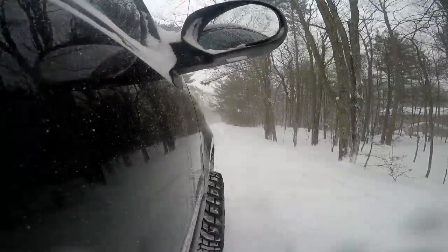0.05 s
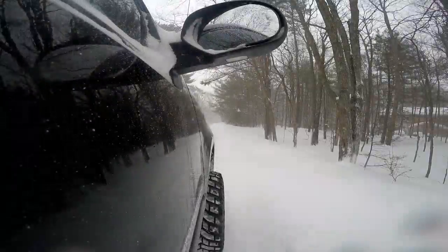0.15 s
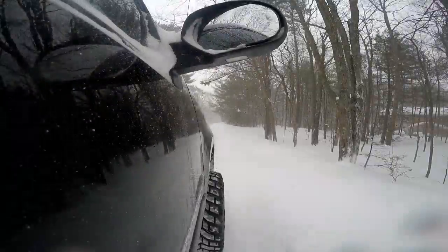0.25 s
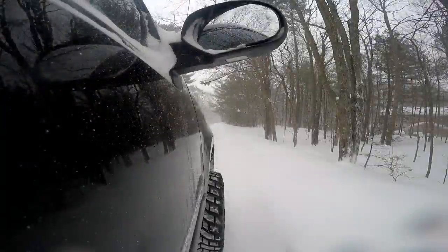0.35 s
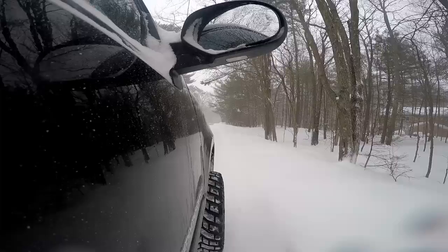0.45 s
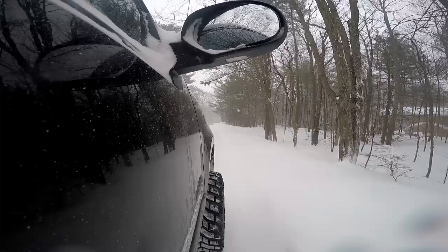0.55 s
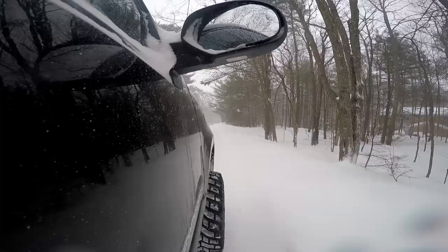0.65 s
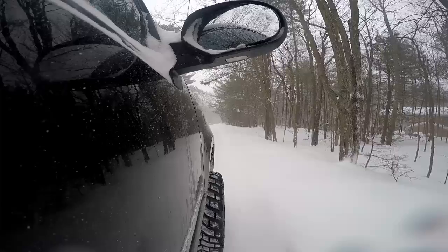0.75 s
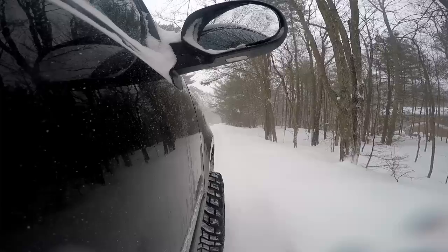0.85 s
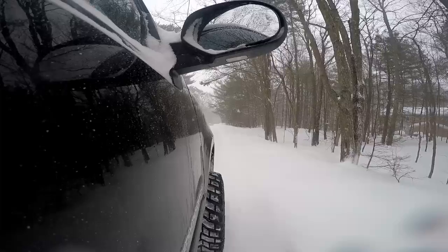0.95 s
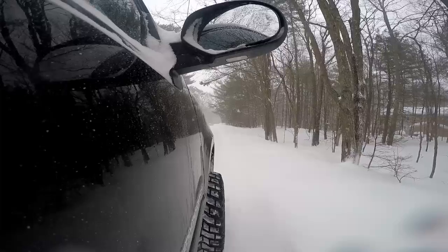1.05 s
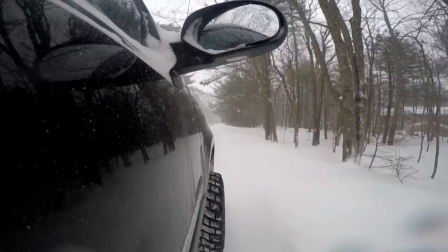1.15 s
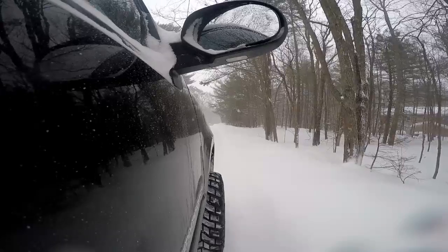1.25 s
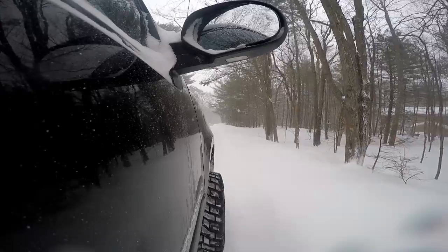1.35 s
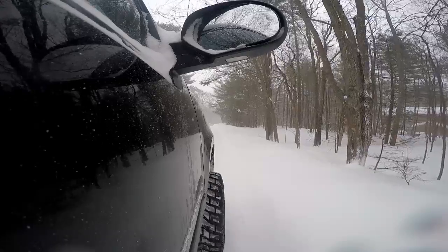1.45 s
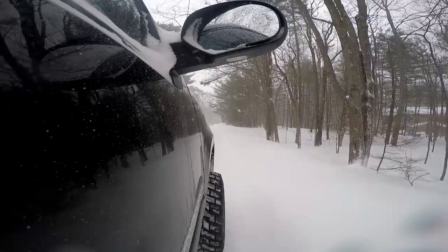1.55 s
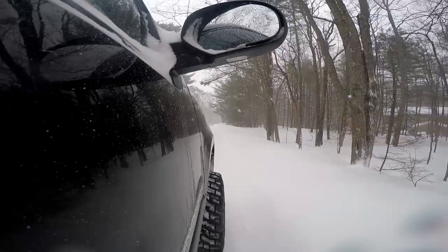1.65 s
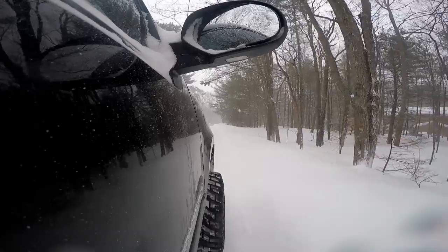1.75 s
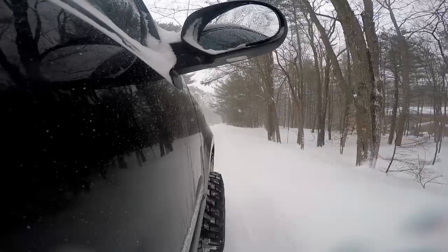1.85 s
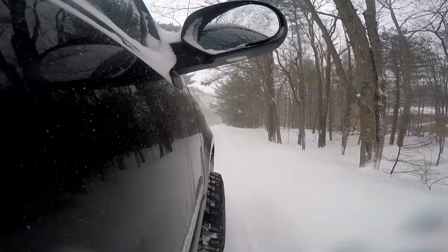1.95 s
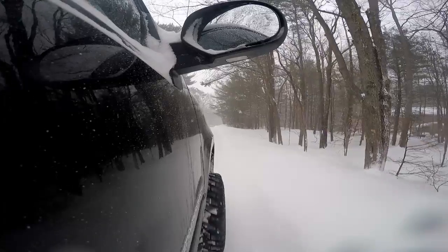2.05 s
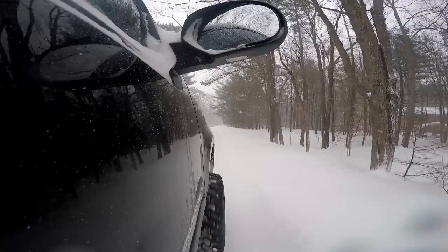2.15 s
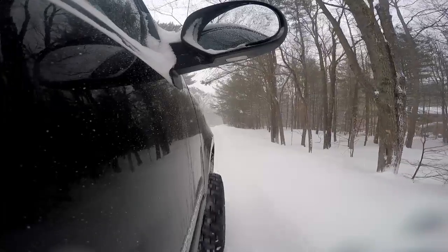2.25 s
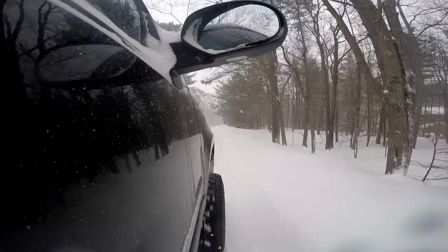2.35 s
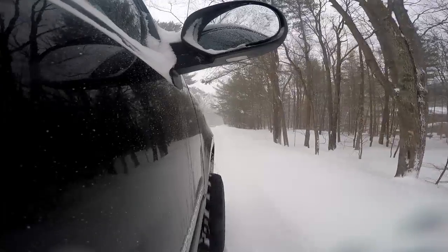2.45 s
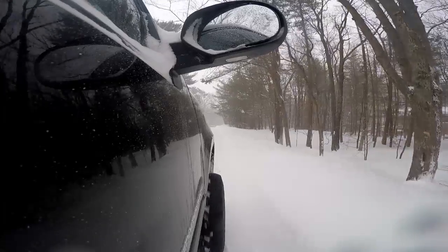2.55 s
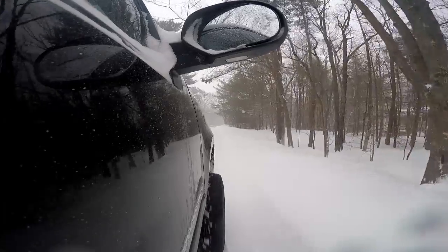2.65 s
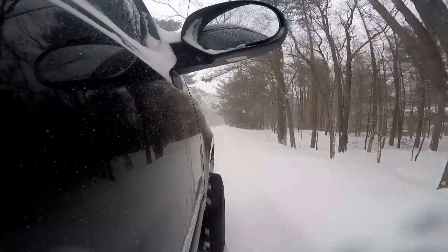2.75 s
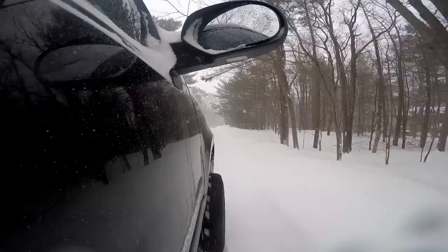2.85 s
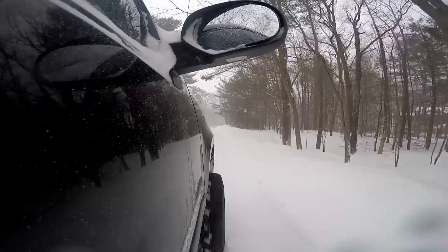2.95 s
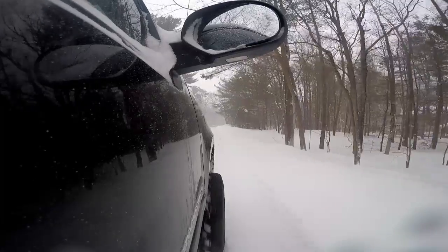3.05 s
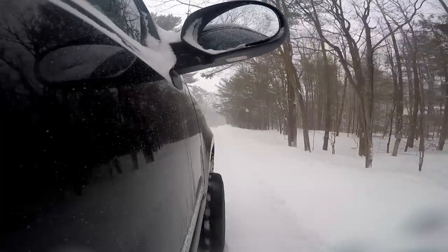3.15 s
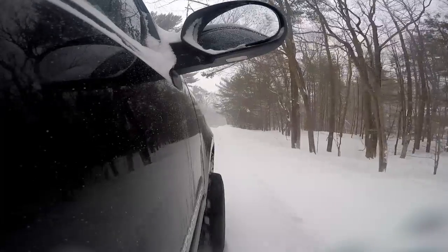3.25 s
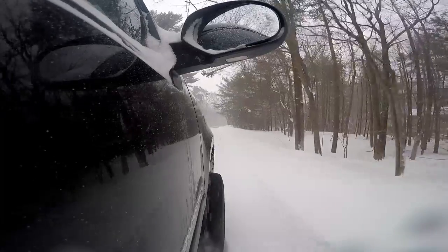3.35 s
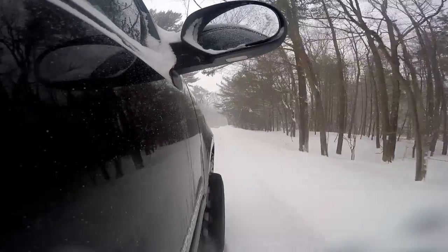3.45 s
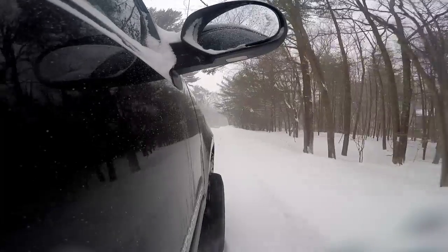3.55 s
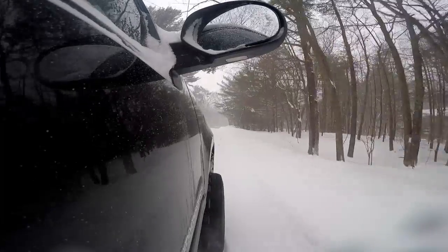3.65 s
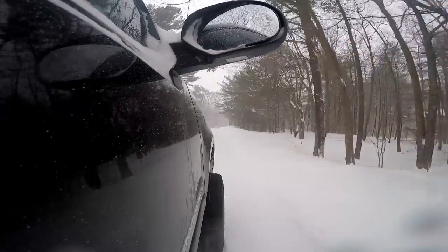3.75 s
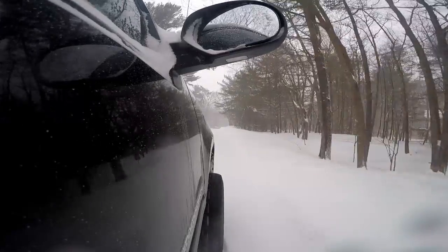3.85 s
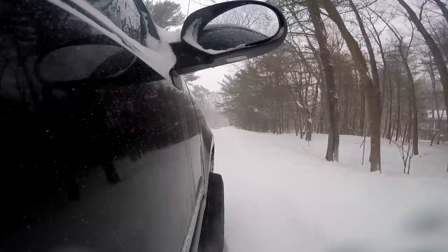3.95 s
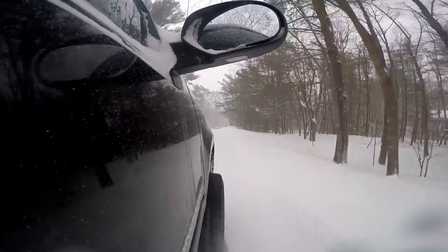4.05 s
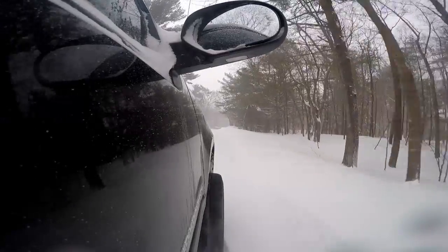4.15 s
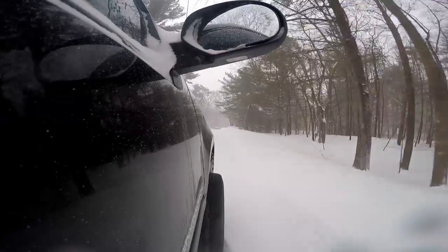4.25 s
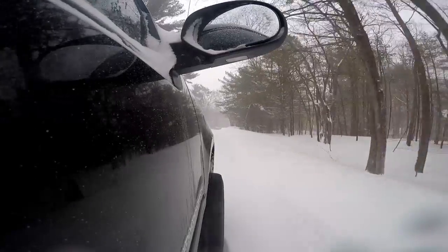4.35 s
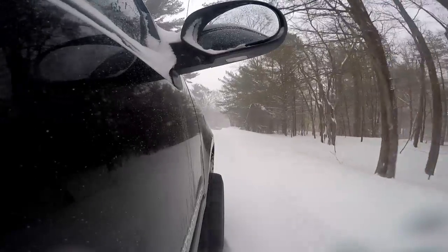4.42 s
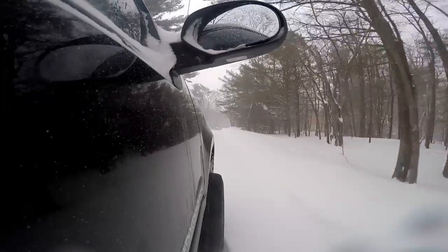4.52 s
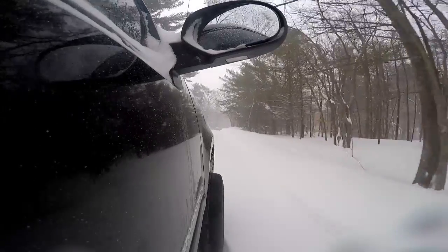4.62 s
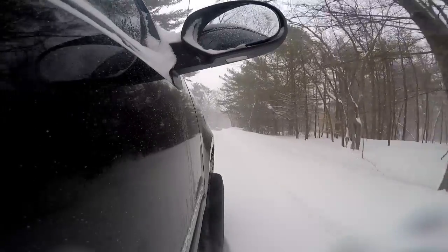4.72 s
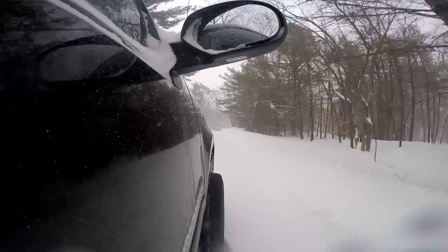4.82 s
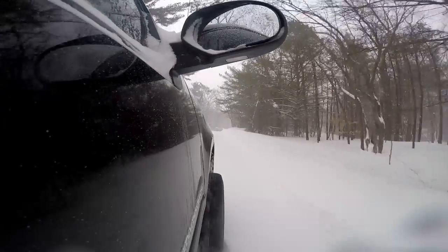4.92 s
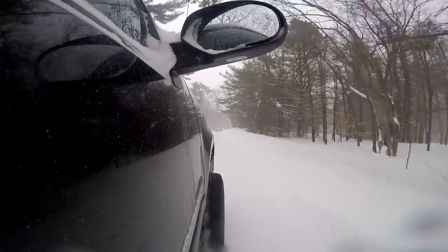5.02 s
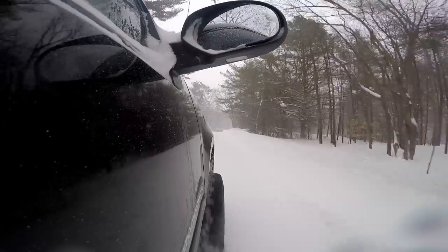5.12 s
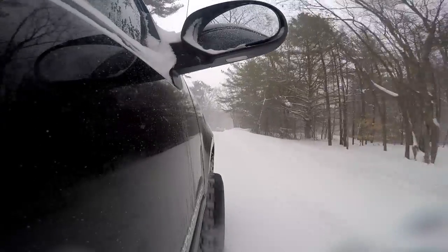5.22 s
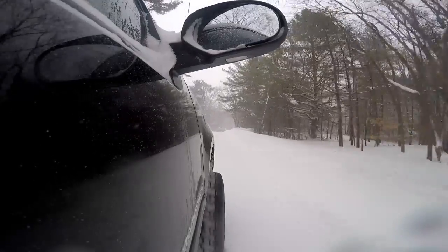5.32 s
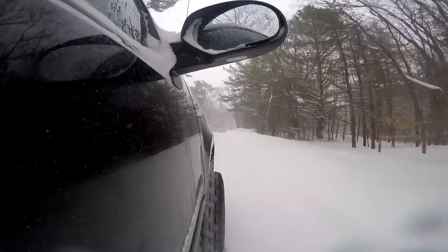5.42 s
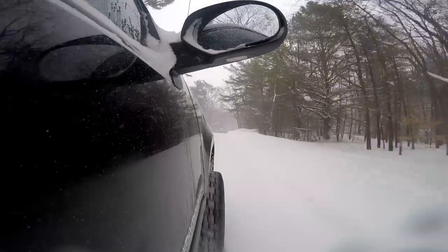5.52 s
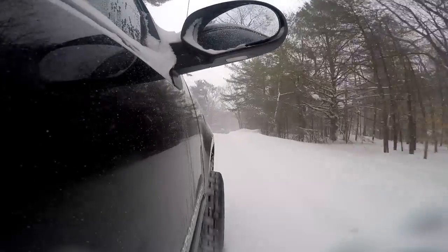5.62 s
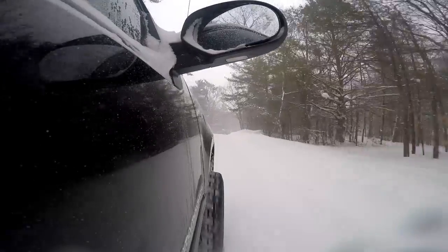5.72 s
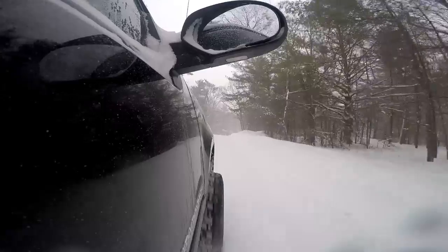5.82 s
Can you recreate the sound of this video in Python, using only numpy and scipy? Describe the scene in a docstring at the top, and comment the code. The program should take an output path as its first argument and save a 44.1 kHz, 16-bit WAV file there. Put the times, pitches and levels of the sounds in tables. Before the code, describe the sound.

Heard from outside its door, a truck accelerates through snow, its engine growl climbing then dropping amid booming wind and icy clicks.

```python
"""A V8 truck idles, pulls hard through deep snow and lifts off, heard from a camera outside its door.
Eight cylinders puff through the exhaust pipe, so its note climbs with the revs, and the fan roars.
Wind and bumps keep the door panel booming. The tyres press through the snow, and the front one flings
it at the camera, where it patters and snaps. In the quiet start the camera's own electronics can be
heard ticking and whining faintly."""
import sys
import numpy as np
from scipy import signal
from scipy.fft import rfft, irfft, next_fast_len
from scipy.io import wavfile

SR = 44100
rng = np.random.default_rng(int(sys.argv[2]) if len(sys.argv) > 2 else 0)


def bounce(signal):
    """Save signal as a 16-bit WAV file at the path given by the first command-line argument."""
    frames = np.transpose(np.atleast_2d(signal))
    limited = np.clip(frames, -1, 1)
    pcm = np.round(limited * 32767).astype(np.int16)
    wavfile.write(sys.argv[1], SR, pcm)


N = 259308
TIME = np.arange(N) / SR


def from_db(db):
    """Turn decibels into a number to multiply by."""
    return 10 ** (np.asarray(db) / 20)


def rms_one(x):
    """Scale a sound so that its average strength (rms) is 1."""
    return x / np.sqrt(np.mean(x ** 2) + 1e-20)


def curve(table, at=TIME):
    """Join a table's points with straight lines and read off values, by default over time."""
    return np.interp(at, *np.transpose(table))


def gain_at(spectrum, hz):
    """How much of a frequency a (frequency, level) table lets through; little beyond its ends."""
    freqs, db = np.transpose(spectrum)
    hz = np.maximum(hz, 1)
    roll_off = np.minimum(1, np.minimum(hz / freqs[0], freqs[-1] / hz)) ** 4
    return from_db(np.interp(np.log(hz), np.log(freqs), db)) * roll_off


def colour(x, spectrum):
    """Filter a sound so that it rings only after each hit, never before (minimum phase)."""
    size = 2 * next_fast_len(N)
    hz = np.arange(size // 2 + 1) * SR / size
    cepstrum = irfft(np.log(gain_at(spectrum, hz) + 1e-5))
    cepstrum[1:size // 2] *= 2
    cepstrum[size // 2 + 1:] = 0
    return irfft(rfft(x, size) * np.exp(rfft(cepstrum)))[:N]


def noise(spectrum):
    """Noise of strength 1 with the given mix of lows and highs."""
    return rms_one(colour(rng.standard_normal(N), spectrum))


def drift(rate_hz):
    """A smooth random wander, typically about 1 in size."""
    step, warm_up = 40, 2000  # samples per point; points thrown away
    r = np.exp(-2 * np.pi * step * rate_hz / SR)
    slow = signal.lfilter([1], [1, -2 * r, r * r], rng.standard_normal(N // step + warm_up + 2))
    slow = rms_one(slow[warm_up:])
    return np.interp(np.arange(N) / step, np.arange(len(slow)), slow)


def resonate(x, hz, width_hz):
    """Make a sound ring at one pitch; a narrower width rings longer."""
    r = np.exp(-np.pi * width_hz / SR)
    feedback = [1, -2 * r * np.cos(2 * np.pi * hz / SR), r * r]
    return signal.lfilter(np.array([1, 0, -1]) * (1 - r * r) / 2, feedback, x + 1e-18)


def muffle(x, above_hz):
    """Take away the highs."""
    return signal.sosfilt(signal.butter(2, above_hz, fs=SR, output="sos"), x)


def tone(angle):
    """A pure tone of strength 1."""
    return np.sqrt(2) * np.sin(angle)


def angle_of(hz):
    """How far a wave has turned while its pitch moves."""
    return 2 * np.pi * np.cumsum(hz) / SR


# The steady tones of the electronic whine: (pitch [Hz], level [dB])
WHINE_TONES = [(6293, -76), (6325, -75), (12618, -78)]
def electronics(beacon_s=0.1024, frames_per_s=30, pip_hz=8603, pip_db=-66):
    """The camera's radio beacon leaks in as dull ticks, over a thin whine and a pip per picture."""
    at = (np.arange(0.0177, TIME[-1], beacon_s) * SR).astype(int)
    clicks = np.zeros(N)
    clicks[at] = from_db(5 + 1.1 * rng.standard_normal(len(at)))
    ticks = muffle(resonate(clicks, hz=154, width_hz=220), above_hz=390)
    whine = sum(from_db(db) * tone(2 * np.pi * hz * TIME) for hz, db in WHINE_TONES)
    pulses = np.maximum(np.cos(2 * np.pi * frames_per_s * TIME), 0) ** 2
    pips = from_db(pip_db) * tone(2 * np.pi * pip_hz * TIME) * pulses
    return ticks + whine + pips


# Two extra dull ticks near the start: (time [s], level before filtering [dB])
STRAY_TICKS = [(0.198, 5), (0.217, 6)]
def stray_ticks():
    """Two clicks ring low and briefly, sounding like the camera's radio ticks."""
    clicks = np.zeros(N)
    for time_s, db in STRAY_TICKS:
        clicks[round(time_s * SR)] = -from_db(db)
    return muffle(resonate(clicks, hz=170, width_hz=160), above_hz=380)


# Whistles of rushing air: (start [s], end [s], pitch [Hz], width [Hz], level [dB])
WHISTLES = [(3.27, 5.2, 4520, 330, -55), (4.55, 5.0, 1335, 35, -50), (4.7, 5.4, 1830, 85, -44.5),
            (3.9, 4.75, 2310, 25, -45), (4.33, 4.75, 1700, 50, -39), (5.79, 5.87, 2300, 700, -42)]
def air_whistles(fade_s=0.0073):
    """Rushing air sets off ringing at a few pitches, each for a short while."""
    out = 0
    for start, end, hz, width_hz, db in WHISTLES:
        fade = np.clip(np.minimum(TIME - start, end - TIME) / fade_s, 0, 1)
        out += from_db(db) * fade * rms_one(resonate(rng.standard_normal(N), hz, width_hz))
    return out


# Tyre noise, louder as the truck goes faster: (time [s], level [dB])
TYRE_LEVEL = [(0.4, -62.5), (1.5, -55.5), (1.95, -52.5), (2.25, -49), (3.25, -45), (4.6, -36.5), (5.0, -49),
              (5.88, -49)]
# Its mix of lows and highs: (frequency [Hz], relative level [dB])
TYRE_COLOUR = [(300, -2.5), (500, -6), (600, 3.5), (800, 4), (1000, 2), (1250, -5), (1700, 1.5),
               (3000, -37.5)]
def tyres(waver_db=0.98):
    """The tyres press through the snow with a slightly wavering rush."""
    return from_db(curve(TYRE_LEVEL) + waver_db * drift(1.9)) * noise(TYRE_COLOUR)


# Icy crumbs hitting the camera: (time [s], peak [dB], shell pitch [Hz], bright top against shell [dB])
CRUMB_HITS = [(0.4917, -35, 4450, -4), (0.5101, -35, 4300, -3), (0.5793, -35, 4150, 3),
              (0.7114, -40, 4350, -6), (0.8213, -33, 4050, -6), (0.9433, -38, 4150, 6),
              (1.6598, -22, 4400, -5), (1.7448, -38, 5250, 0), (1.8206, -36, 3950, -5),
              (2.2501, -30, 4500, -1), (2.7578, -27, 4750, -1), (2.8194, -37, 3800, -6),
              (2.9442, -24, 4600, -3), (3.068, -21, 4450, -13), (3.0974, -28, 5450, 3),
              (3.2392, -28, 5000, -5), (3.2763, -26, 4700, -1), (3.2899, -25, 4900, -11),
              (3.3166, -28, 4450, -4), (3.3343, -23, 4400, -11), (3.3745, -28, 4550, -2),
              (3.3984, -26, 4750, -9), (3.4554, -22, 4300, -1), (3.48, -16, 4250, -6),
              (3.5073, -23, 5250, -3), (3.5219, -23, 5150, 3), (3.5314, -21, 4550, -7),
              (3.5632, -24, 4150, -11), (3.6007, -26, 4300, -5), (3.8488, -27, 4750, -7),
              (3.9344, -27, 4750, -2), (3.9449, -13, 4350, -4), (4.0712, -23, 4500, 0),
              (4.0921, -21, 4500, -1), (4.2264, -19, 5200, -3), (4.304, -26, 4600, -6),
              (4.3726, -28, 4450, 2), (4.682, -27, 5050, -3), (5.171, -28, 4500, 3), (5.378, -25, 4650, -6),
              (5.4005, -14, 4400, -6), (5.4044, -21, 4450, 0), (5.4572, -21, 4450, 0),
              (5.4663, -18, 4750, -4), (5.4946, -26, 4750, -3), (5.5247, -27, 5150, 4),
              (5.5531, -29, 5200, 0), (5.598, -21, 5300, -3), (5.6395, -32, 4250, -8)]
def icy_crumbs(crack_s=0.0005, top_hz=11000):
    """Each crumb rings the camera's shell at a pitch set by where it lands, with its own amount of bright top."""
    out = np.zeros(N + SR)
    age = TIME[:SR // 100]
    for time_s, peak_db, shell_hz, top_db in CRUMB_HITS:
        crack = rng.standard_normal(len(age)) * np.exp(-age / crack_s)
        shell = resonate(resonate(crack, shell_hz, width_hz=4000), shell_hz, width_hz=1700)
        top = resonate(resonate(crack, top_hz, width_hz=7000), top_hz, width_hz=7000)
        snap = rms_one(shell) + from_db(top_db) * rms_one(top)
        at = round(time_s * SR)
        out[at:at + len(age)] += from_db(peak_db) * snap / np.abs(snap).max()
    return out[:N]


def grains(per_s, spread_db):
    """Tiny hits at random moments, most weak and a few strong."""
    sizes = from_db(spread_db * np.minimum(rng.exponential(1, N), 5)) * rng.choice([-1, 1], N)
    return rms_one(sizes * (rng.random(N) < per_s / SR))


def scatter(hits, bands=8):
    """Each grain lands on a different spot, so it gets its own mix of lower and higher sound."""
    edges_hz = np.geomspace(1800, 16000, bands + 1)
    out = 0
    for band in zip(edges_hz, edges_hz[1:]):
        band_filter = signal.butter(2, band, "band", fs=SR, output="sos")
        out += signal.sosfilt(band_filter, hits * rng.standard_normal(N) + 1e-18)
    return out


# Fine snow thrown by the tyre: (time [s], relative level [dB])
SPRAY_LEVEL = [(0.3, -82), (0.8, -79.5), (1.2, -82.5), (2.6, -77), (3.46, -69.5), (3.8, -66), (4.15, -58),
               (4.42, -71.5), (5.0, -79), (5.45, -65), (5.66, -79)]
# Soft clumps bursting on the camera: (time [s], relative level [dB], fade time [s])
SNOW_CLUMPS = [(3.372, -45, .025), (3.66, -44, .04), (4.066, -42, .06), (4.21, -43, .03), (5.13, -51, .05),
               (5.317, -39, .016), (5.358, -45, .02), (5.395, -32, .008), (5.438, -33.5, .026),
               (5.594, -36, .009), (5.745, -49, .03)]
# How the camera's shell colours the hits: (frequency [Hz], relative level [dB])
SHELL_COLOUR = [(2000, 0.5), (3200, 3), (3900, 2.5), (4550, 8.5), (5400, 2), (6500, 7.5), (8200, 2),
                (9400, 4), (11200, -6), (13400, 2), (15500, -10)]
def snow_spray(spurt_db=3.0, cloud_s=0.0083, rise_s=0.003):
    """Snow patters on the plastic shell in spurts; clumps burst quickly and trickle away."""
    patter = grains(per_s=5000, spread_db=3.2) * from_db(spurt_db * np.clip(drift(45), -2, 1.6))
    grit = grains(per_s=220, spread_db=2.4)
    # Every icy crumb flies in its own little cloud of powder.
    clouds = sum(from_db(db - 41.5) * np.exp(-np.abs(TIME - time_s) / cloud_s)
                 for time_s, db, _, _ in CRUMB_HITS)
    powder = np.hypot(from_db(curve(SPRAY_LEVEL)), clouds) * from_db(11) * (patter + grit)
    bursts = 0
    for time_s, db, fade_s in SNOW_CLUMPS:
        rise = np.clip((TIME - time_s) / rise_s + 0.5, 0, 1)
        bursts += from_db(db) * rise * np.exp(-np.abs(TIME - time_s - rise_s / 2) / fade_s)
    clumps = bursts * grains(per_s=6000, spread_db=5.0)
    return from_db(3.5) * colour(scatter(powder + clumps), SHELL_COLOUR)


# The door panel's lowest note: (time [s], pitch [Hz])
PANEL_PITCH = [(0, 41.2), (1.5, 39.08), (2.0, 39.79), (3.2, 39.62), (3.6, 38.28), (4.8, 38.35),
               (5.0, 35.84), (5.3, 39.9)]
# How hard the panel swings: (time [s], level [dB])
PANEL_LEVEL = [(0.42, -34.5), (0.95, -22), (1.98, -27.5), (2.01, -9.5), (2.3, -22), (2.39, -6.5),
               (2.79, -9.5), (2.85, -17), (2.98, -19), (3.11, -9.5), (3.38, -16.5), (3.53, -8),
               (4.34, -10.5), (4.39, -24.5), (4.45, -7), (4.8, -11.5), (4.9, -18), (5.4, -11), (5.81, -15),
               (5.88, -21.5)]
def door_panel(waver_hz=0.65, throb_db=0.5):
    """Wind and bumps swing the door panel like a big drum, never quite evenly."""
    swing = tone(angle_of(curve(PANEL_PITCH) + waver_hz * drift(24)))
    shudder = 0.36 * noise([(24, -4.5), (32, 0.5), (52, -6)])
    return from_db(curve(PANEL_LEVEL) + throb_db * drift(11)) * (swing + shudder)


# Gusts of wind: (time of peak [s], level [dB])
WIND_GUSTS = [(1.5, -31), (2.11, -25), (2.44, -53), (3.12, -21.5), (3.43, -20), (3.95, -26), (4.4, -43),
              (4.7, -40), (5.0, -30), (5.29, -46), (5.84, -29)]
# The wind's deep rumble: (frequency [Hz], relative level [dB])
WIND_COLOUR = [(20, -18.5), (40, 12.5), (70, 11.5), (105, 2), (150, -3), (220, -17), (320, -22.5),
               (500, -40), (900, -40)]
def wind(rise_s=0.08, fall_s=0.14):
    """Air buffets the camera: gusts on top of a rumble that partly follows the door panel's swing."""
    panel_db = curve(PANEL_LEVEL)
    rumble = from_db(-29.5 + 0.37 * (panel_db - panel_db.mean()))
    gusts = sum(from_db(db) * np.exp(-np.maximum((peak_s - TIME) / rise_s, (TIME - peak_s) / fall_s))
                for peak_s, db in WIND_GUSTS)
    return np.hypot(rumble, gusts) * noise(WIND_COLOUR)


def effort_db(growth, firing_hz, throttle, lag_s, idle_hz=47):
    """Level grows with engine speed and load (how hard it works); the load trails the pedal."""
    idle_db, load_db, speed_db, both_db = growth
    r = np.exp(-1 / (lag_s * SR))
    load = signal.lfilter([1 - r], [1, -r], throttle)
    above_idle = (firing_hz - idle_hz) / 100
    return idle_db + load_db * load + above_idle * (speed_db + both_db * load)


# How the fan's roar grows: (relative level at idle [dB], rise at full load [dB],
# rise per 100 firings a second [dB], extra rise per 100 at full load [dB])
FAN_GROWTH = (-48.5, 0, 6, 4)
# The roar at low revs: (frequency [Hz], relative level [dB])
SLOW_FAN_COLOUR = [(900, -20), (1250, -9.5), (1730, 4), (2100, 3.5), (2540, 6.5), (2860, 3), (3250, -7),
                   (4700, -11), (6500, -16), (8000, -22.5), (11000, -28), (15500, -28)]
# The roar at high revs: (frequency [Hz], relative level [dB])
FAST_FAN_COLOUR = [(710, -44), (1200, -9), (1390, -10.5), (1690, -3.5), (1880, -0.5), (1960, -5.5),
                   (2620, -4.5), (2890, -9), (3280, -21), (4530, -23.5), (5980, -27.5), (6510, -25),
                   (10200, -47), (13500, -45), (15500, -73)]
def fan(firing_hz, throttle, throb=0.089):
    """Air tears through the engine bay, throbbing with the firing; lower ringing takes over at speed."""
    roar_db = effort_db(FAN_GROWTH, firing_hz, throttle, lag_s=0.048) - 0.78
    fast = np.clip((firing_hz - 62) / 150, 0, 1)
    air = np.sqrt(1 - fast) * noise(SLOW_FAN_COLOUR) + np.sqrt(fast) * noise(FAST_FAN_COLOUR)
    return from_db(roar_db) * air * (1 + throb * np.sin(angle_of(firing_hz)))


# The main note swells and fades as it climbs past the pipe's own notes:
# (pitch [Hz], level at full throttle [dB])
FIRING_NOTE = [(47, -37), (70, -25.5), (88, -26.5), (105, -19), (124, -26.5), (135, -34.5), (142, -25),
               (188, -32.5), (213, -28), (240, -32.5), (264, -28)]
# The note an octave above it: (pitch [Hz], level at full throttle [dB])
OCTAVE_NOTE = [(100, -49), (150, -42), (170, -31), (198, -30), (215, -52), (245, -42), (260, -40.5),
               (300, -43), (340, -39), (410, -39.5), (450, -45), (525, -44)]
# One row of cylinders burbles as the throttle closes: (time [s], level [dB])
BURBLE_LEVEL = [(3.9, -57), (4.3, -31), (4.55, -36.5), (4.7, -22), (5.0, -29), (5.25, -44)]
def exhaust_notes(firing_hz, throttle, cycle_angle, cylinders):
    """The firings blend into a note and its octave, weaker off the pedal, with a low burble beneath."""
    firing_db = curve(FIRING_NOTE, firing_hz) - 12.5 * (1 - throttle)
    octave_db = curve(OCTAVE_NOTE, 2 * firing_hz) - 21 * (1 - throttle)
    notes = [(3, curve(BURBLE_LEVEL)), (cylinders, firing_db), (2 * cylinders, octave_db)]
    return sum(from_db(db) * tone(per_cycle * cycle_angle) * (1 + 0.2 * drift(2.7))
               for per_cycle, db in notes)


# Extra tones from uneven firing: (waves per engine cycle [count], relative level [dB])
GROWL_TONES = [(4, -6.5), (5, 6.5), (6, 1.5), (7, 4.0), (9, 4.0), (10, 2.0), (11, 1.5), (12, -1.0),
               (13, 4.5), (14, 1.5), (15, -5.5), (17, -2.0), (18, 1.0), (19, -1.0), (20, 0.5), (21, 3.5),
               (22, -1.0), (23, -7.0), (24, 2.5), (25, -1.5), (26, 0.0), (27, -2.0), (28, -1.5), (29, 2.0),
               (30, -1.0), (31, -3.0), (32, 0.0), (33, -1.0)]
# What the exhaust pipe lets through: (frequency [Hz], relative level [dB])
PIPE_COLOUR = [(45, -2), (75, 6), (105, 4), (145, -3), (200, -4), (260, -5.5), (310, -4.5), (365, -1.5),
               (420, -8.5), (500, -4.5), (590, -16), (700, -17), (900, -21), (1400, -37)]
def exhaust_growl(firing_hz, cycle_hz, exhaust_db):
    """Unequal pulses from the cylinders add a growl, shaped by the pipe, as the revs rise."""
    revving = np.clip((firing_hz - 62) / 80, 0, 1)
    cycle_angle = angle_of(cycle_hz)
    out = 0
    for per_cycle, db in GROWL_TONES:
        hz = per_cycle * cycle_hz
        # Hard work sharpens the pulses, so high tones grow faster than low ones.
        load_db = (exhaust_db + 40) * np.interp(hz, [100, 350], [0.3, 0.6])
        strength = from_db(db + load_db - 45) * gain_at(PIPE_COLOUR, hz) * (1 + 0.25 * drift(2.5))
        out += strength * tone(per_cycle * cycle_angle + 2 * np.pi * rng.random())
    return revving * out


# How the growl and the gas rush grow: (relative level at idle [dB], rise at full load [dB],
# rise per 100 firings a second [dB], extra rise per 100 at full load [dB])
EXHAUST_GROWTH = (-58, 6, 0.18, 10)
# Gas rushing out of the pipe: (frequency [Hz], relative level [dB])
GAS_COLOUR = [(110, -13.5), (170, -2.5), (220, 4), (310, -6), (380, -6), (440, -3.5), (500, -3.5),
              (570, -22.5), (900, -34)]
def exhaust(firing_hz, throttle, cylinders=8, jitter=0.002):
    """Each cylinder fires once per engine cycle and sends a puff of gas down the pipe."""
    exhaust_db = effort_db(EXHAUST_GROWTH, firing_hz, throttle, lag_s=0.14)
    cycle_hz = firing_hz * (1 + jitter * drift(27.6)) / cylinders
    cycle_angle = angle_of(cycle_hz)
    notes = exhaust_notes(firing_hz, throttle, cycle_angle, cylinders)
    growl = exhaust_growl(firing_hz, cycle_hz, exhaust_db)
    gas_db = exhaust_db + np.interp(firing_hz, [60, 140], [2, -4.5])  # tones stand out at speed
    puffs = from_db(gas_db) * noise(GAS_COLOUR) * (1 + 0.099 * np.sin(cylinders * cycle_angle))
    return notes + growl + puffs


# How fast the engine runs: (time [s], firings per second [Hz])
ENGINE_SPEED = [(0.45, 47.5), (1.0, 74), (1.4, 54.5), (1.87, 49.5), (2.1, 98), (2.4, 119.5), (2.62, 130),
                (3.18, 146.5), (3.4, 165), (3.85, 190.5), (4.2, 222), (4.62, 268), (4.78, 256), (5.0, 202),
                (5.25, 142), (5.42, 101), (5.55, 96), (5.7, 84.4), (5.88, 95.5)]
# The pedal: pull away, long pull, lift off, back on: (time [s], how far it is pressed [0-1])
PEDAL = [(0.6, 0.13), (0.9, 0.66), (1.95, 0.93), (2.08, 0.7), (4.6, 1), (4.7, 0.15), (5.44, 0),
         (5.56, 0.61)]
def engine():
    """The V8's speed and pedal drive both its exhaust and its fan."""
    firing_hz, throttle = curve(ENGINE_SPEED), curve(PEDAL)
    return exhaust(firing_hz, throttle) + fan(firing_hz, throttle)


def scene():
    """Add up every sound at the one microphone; snow leaves no echo."""
    truck = tyres() + engine() + air_whistles() + door_panel()
    at_camera = wind() + snow_spray() + icy_crumbs() + stray_ticks() + electronics()
    return (truck + at_camera)[None]


def record(dry, knee=0.7, headroom=0.27, cutoff_hz=15700):
    """Round off the tallest peaks and cut away the very highest treble."""
    excess = np.maximum(np.abs(dry) - knee, 0)
    rounded = dry - np.sign(dry) * (excess - headroom * np.tanh(excess / headroom))
    return signal.sosfilt(signal.ellip(10, 0.1, 90, cutoff_hz, fs=SR, output="sos"), rounded)


dry = scene()
out = record(dry)
bounce(out)
```